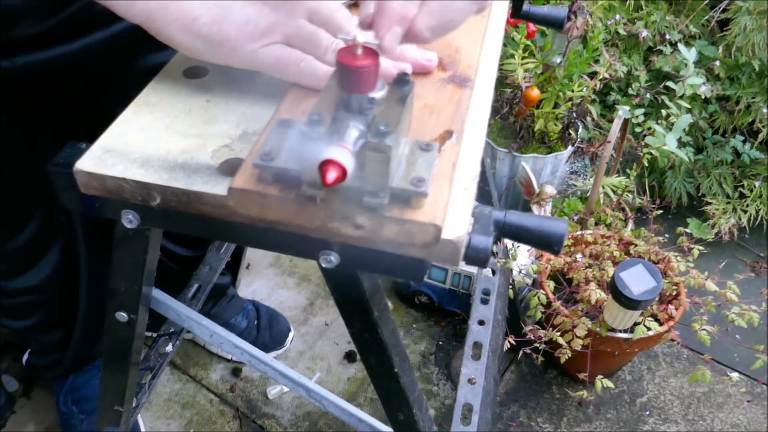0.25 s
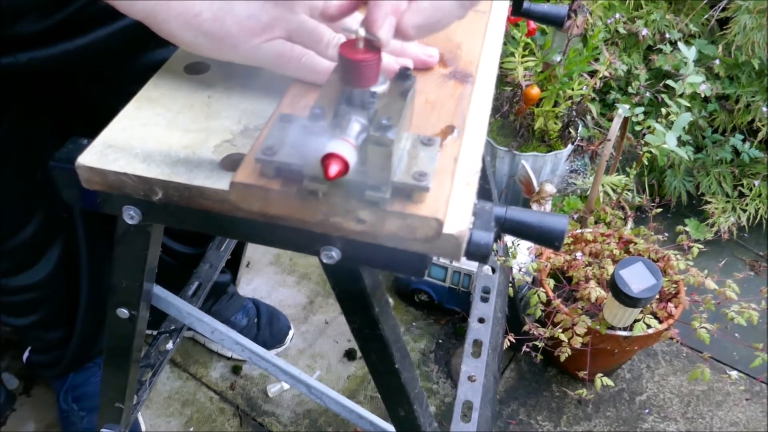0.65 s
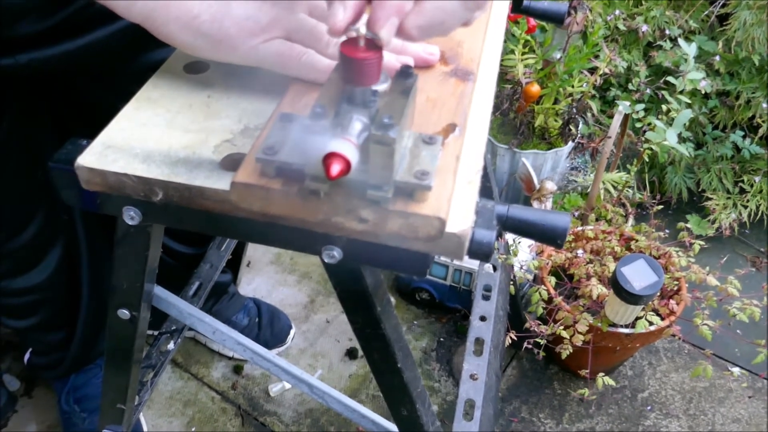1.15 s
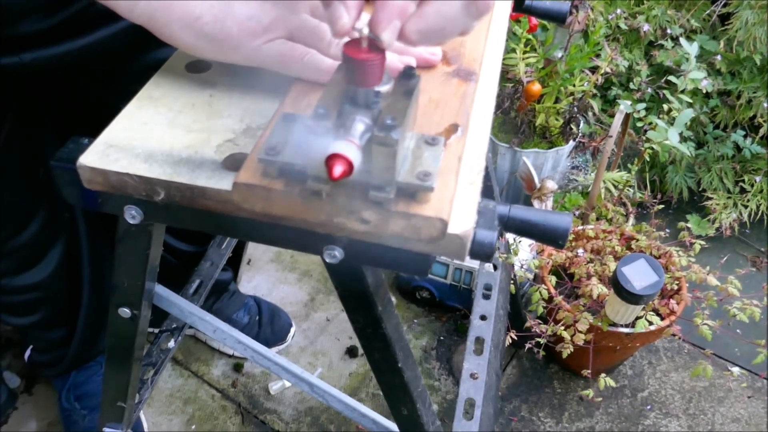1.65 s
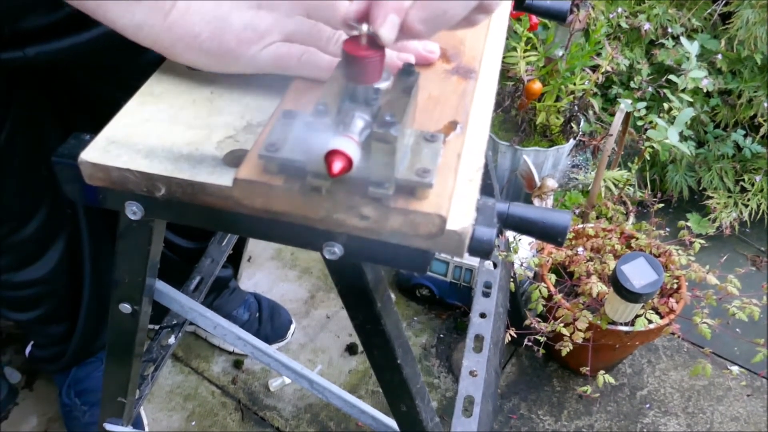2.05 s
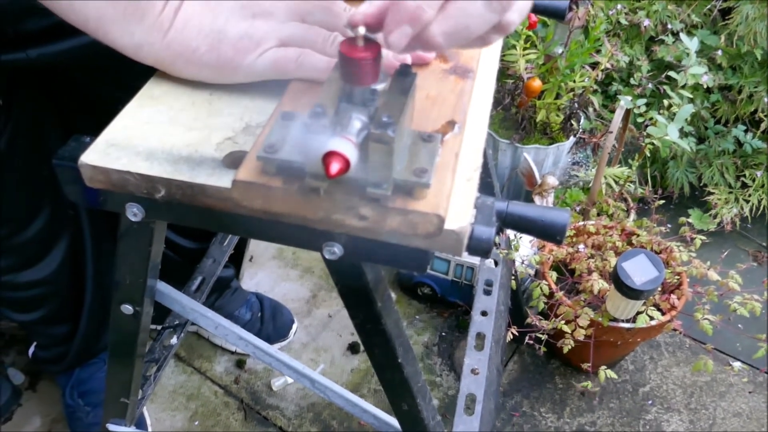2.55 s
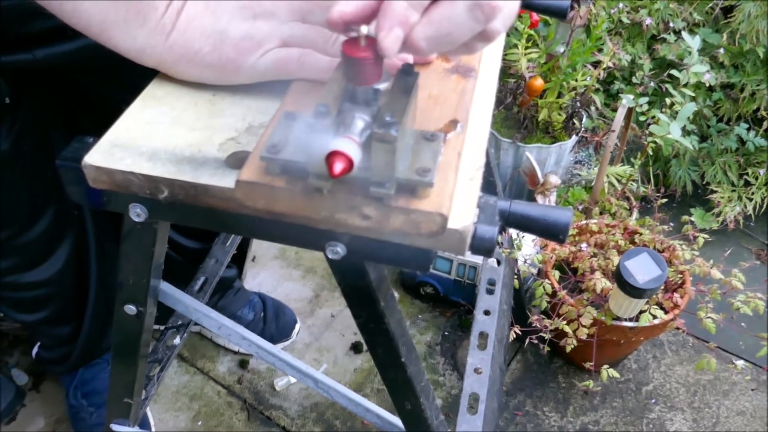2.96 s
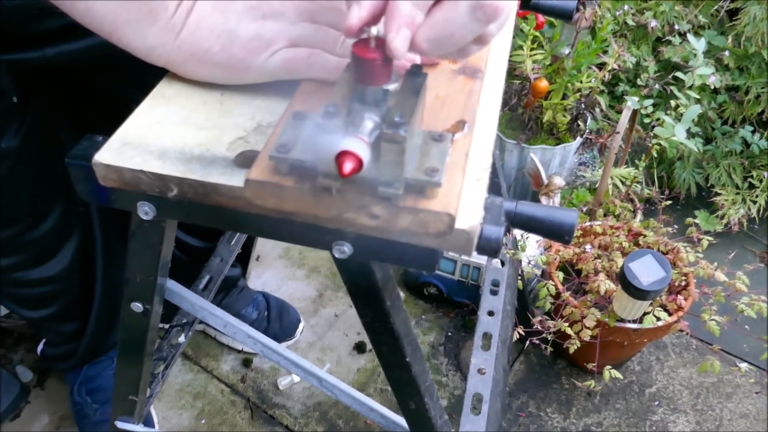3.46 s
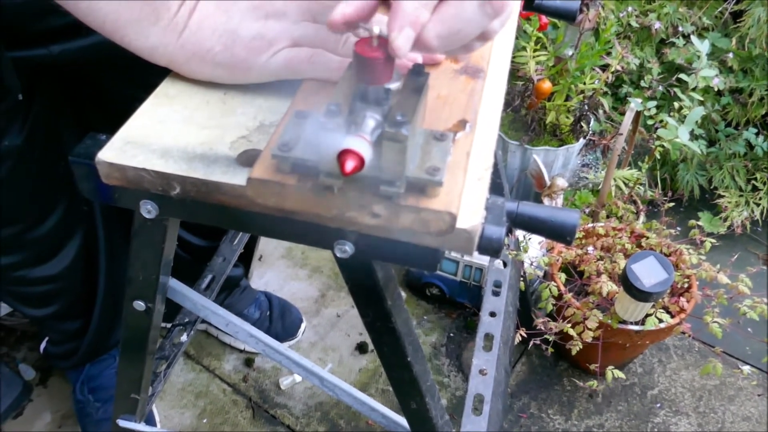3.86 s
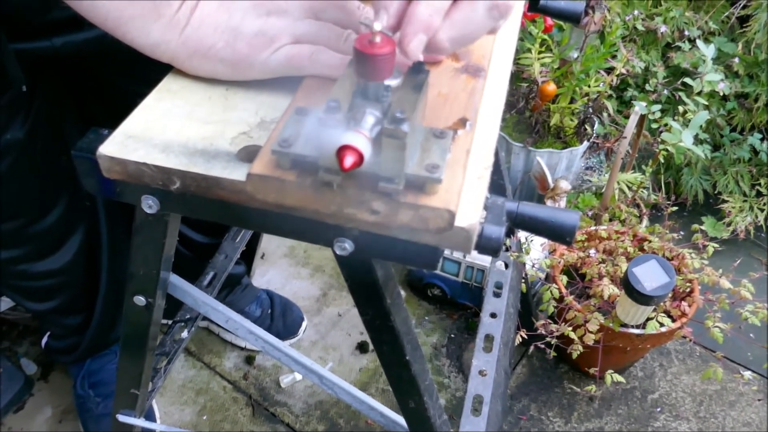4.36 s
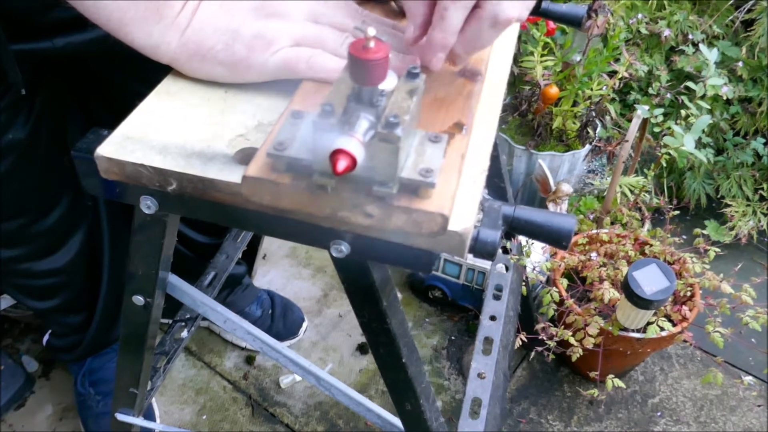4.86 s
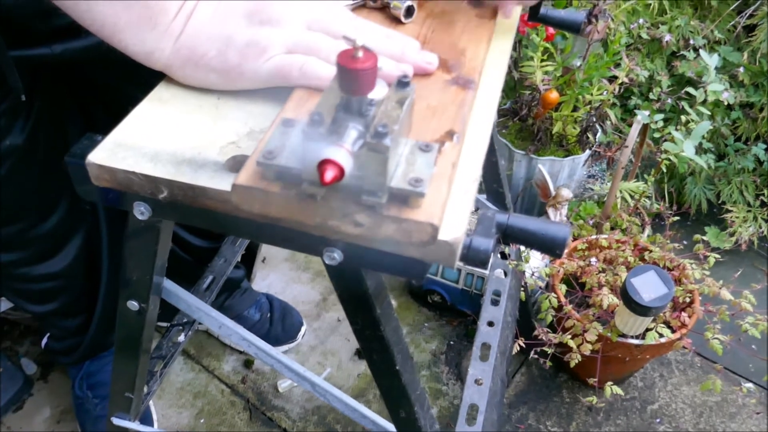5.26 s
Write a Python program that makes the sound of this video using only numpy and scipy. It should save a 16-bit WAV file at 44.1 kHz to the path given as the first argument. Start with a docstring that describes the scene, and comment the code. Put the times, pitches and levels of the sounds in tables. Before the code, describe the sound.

Close up and outdoors, a small model engine on a workbench gives a continuous, hard buzz over the hum and airflow of its propeller, with a thin metallic rattle on top. Its pitch wavers, dips a little and climbs back. A hand adjusting a screw by the exhaust makes the buzz slightly hollow, before it opens into a raspier tone about four seconds in.

```python
"""A model two-stroke diesel engine runs flat out on a wooden workbench in a garden, a hand close by.
From the start its propeller hums and blows air. Each turn brings a fine metallic knock, then a spit
of gas and a sharp exhaust pop that bounces off bench, paving and walls. The speed sags until 3 s.
Just after 2 s, and again from 3.3 s, fingers close round the exhaust to turn a screw and hollow the pop.
The speed recovers; at 4 s the sound opens up and turns raspier, then is partly shaded again by the end."""
import sys
import numpy as np
from scipy import signal
from scipy.fft import rfft, irfft, next_fast_len
from scipy.io import wavfile
from scipy.ndimage import uniform_filter1d

SR = 44100
rng = np.random.default_rng(int(sys.argv[2]) if len(sys.argv) > 2 else 0)


def store_pcm(level_fs):
    """Save levels as 16-bit WAV."""
    pcm = np.round(np.clip(level_fs, -1, 1) * 32767).astype(np.int16)
    wavfile.write(sys.argv[1], SR, np.atleast_2d(pcm).T)


N = 242550
TIME = np.arange(N) / SR
FFT_SIZE = next_fast_len(N + SR // 4)
HZ = np.maximum(np.arange(FFT_SIZE // 2 + 1) * SR / FFT_SIZE, 1)

# How fast the shaft spins: time_s, turns_per_s
SHAFT_SPEED = [(0.0, 115.6), (0.4, 114.9), (0.77, 115.2), (1.07, 113.9), (1.15, 114.2), (1.36, 113.4),
               (1.62, 114.0), (2.42, 109.2), (2.7, 109.7), (3.02, 108.4), (3.17, 108.7), (3.35, 110.6),
               (3.57, 110.9), (3.75, 110.1), (3.92, 110.5), (4.06, 112.1), (4.43, 112.2), (4.61, 112.8),
               (4.84, 111.7), (5.5, 113.6)]
# How much the hand shades the sound: time_s, shade_0_to_1
HAND_SHADE = [(0, 0.73), (1.1, 0.84), (2.1, 0.73), (3.94, 0.74), (4.04, 0.23), (4.35, 0.37), (4.5, 0.47),
              (4.95, 0.46), (5.4, 0.7)]
# Tone of the swirling air from propeller and exhaust: pitch_hz, relative_level_db
AIR_TONE = [(25, -24), (100, -16), (200, -11.5), (400, -7), (700, -4.5), (1400, -2.5), (2600, 1.5),
            (3200, -4), (4000, -8), (4800, -6), (5500, -5), (6200, -12.5), (9000, -12.5), (15500, -24)]
# Echoes off bench top, paving and walls: delay_ms, strength (minus flips the wave)
SURFACE_ECHOES = [(1.726, 0.14), (1.98, -0.25), (2.166, -0.24), (3.698, -0.22), (6.323, -0.08),
                  (8.355, 0.16), (11.058, -0.22), (12.979, -0.12), (13.139, -0.12), (17.615, -0.1)]
# Tone of the piston's knock: pitch_hz, relative_level_db
KNOCK_TONE = [(200, -47), (2000, 10.5), (5000, 4), (6400, -9), (7200, -3), (8600, -0.5), (10000, -5),
              (12000, -11), (15500, -1.5)]
# Pitches at which the engine's metal case rings: pitch_hz, width_hz, boost_db
CASE_RINGS = [(6600, 400, 3), (7950, 270, 9), (8730, 70, 12), (9350, 350, 6), (12100, 420, 8)]
# Tone of gas hissing through the exhaust port: pitch_hz, relative_level_db
HISS_TONE = [(200, -43), (2000, -16), (5000, 9.5), (7000, 3.5), (9500, -6), (12000, -0.5), (13400, -4),
             (15500, -2)]
# Tone of one exhaust pop: pitch_hz, relative_level_db
POP_TONE = [(110, -35.5), (330, -11), (450, -16), (620, -6.5), (1200, -2.5), (2000, -4.5), (2700, 4.5),
            (3050, -7), (3450, -1), (4050, -8.5), (4550, -5), (5400, -7.5), (6000, -23.5), (15000, -41)]
# Peaks and dips that the bench and its surroundings add to the pop: pitch_hz, width_hz, boost_db
BENCH_PEAKS = [(324, 12, -2.5), (466.5, 27, 12.5), (506, 21, -24), (720.5, 52, -16.5), (1103, 46, -5.5),
               (1244.6, 19, -8.5), (1356, 13, 11), (1397, 61, -8), (1438, 50, 6.5), (1553, 34, -2.5),
               (1605, 13, 9), (1768, 55, -6.5), (1897, 224, 8), (1980, 12, -6), (2530, 34, 7.5),
               (3150, 36, 10), (4477, 114, 5), (6510, 240, 8), (7420, 880, -22.5)]
# The pop's five bands, low to high (body, bark, ring, rasp, crack):
# level_db, speed_db (per extra turn a second), shade_db, grip_db
POP_BANDS = [(-33, -0.09, -1.88, 1), (-31, -0.1, -2, -3.5), (-36, 0.4, 2.5, 1.7), (-34.5, 0.4, -6.5, -0.6),
             (-37, -.1, -0.8, 1)]
# Where one of those bands ends and the next begins: pitch_hz
BAND_BORDERS = [1750, 2490, 3000, 4050]
# Fingers closing round the exhaust: start_s, end_s, tightness_0_to_1
FINGER_GRIPS = [(2.068, 2.36, 0.96), (3.277, 4.022, 0.93)]
# How alike the noise is on the left and right: pitch_hz, likeness_0_to_1
STEREO_LIKENESS = [(30, 0.63), (70, 0.36), (200, 0.84), (1000, 0.82), (4000, 1), (6500, 0.53), (8600, 0.63),
                   (11000, 0.92), (15000, 1)]
# How much louder the left is than the right: pitch_hz, difference_db
LEFT_LOUDER = [(60, -11), (110, -0.5), (220, 1.2), (340, -1), (480, -1.5), (740, 1.6), (1220, 3),
               (3300, -0.7), (5500, 1), (9000, -.5)]
# How far the left wave runs ahead of the right: pitch_hz, phase_radians
LEFT_AHEAD = [(0, 0), (1030, 0.13), (1460, -0.28), (1980, -0.12), (5600, -0.14), (6550, 0.071),
              (8010, -0.37), (8270, -0.1), (9130, -0.35), (9820, 0.036), (16000, 0.0), (16500, 0.1)]


def from_db(db):
    """Turn decibels into a number to multiply by."""
    return 10 ** (np.asarray(db) / 20)


def unit_level(x):
    """Scale a signal so that its average level (rms) is 1."""
    return x / np.sqrt(np.mean(x ** 2) + 1e-20)


def steady_level(x, window=6000):
    """Hold the level near 1 from moment to moment."""
    power = uniform_filter1d(uniform_filter1d(x ** 2, window), window // 2)
    return x / np.sqrt(power + 1e-20)


def over_time(table):
    """Join a table's points into a value for every sample."""
    time_s, value = np.transpose(table)
    return np.interp(TIME, time_s, value)


def over_pitch(table):
    """Join a table's points into a value for every frequency."""
    pitch_hz, value = np.transpose(table)
    return np.interp(np.log(HZ), np.log(pitch_hz), value)


def peaks_db(table):
    """Draw a bell-shaped peak or dip around each listed pitch."""
    return sum(db / (1 + (2 * (HZ - hz) / width_hz) ** 2) for hz, width_hz, db in table)


def filtered(x, response):
    """Scale and delay each frequency of a signal as the response says."""
    return irfft(rfft(x, FFT_SIZE) * response, FFT_SIZE)[..., :N]


def ringing_filter(tone_db):
    """A filter with this tone that rings only after a hit, never before (minimum phase)."""
    cepstrum = irfft(np.log(from_db(tone_db)), FFT_SIZE)
    cepstrum[1:FFT_SIZE // 2] *= 2
    cepstrum[FFT_SIZE // 2 + 1:] = 0
    return np.exp(rfft(cepstrum))


def sway(spread_db, rate_hz=2.56, step=40):
    """A slow, random rise and fall in level, in decibels."""
    memory = np.exp(-2 * np.pi * step * rate_hz / SR)
    noise = rng.standard_normal(2 * N // step)
    slow = signal.lfilter([1], [1, -2 * memory, memory ** 2], noise)[N // step:]
    slow = unit_level(slow - slow.mean())
    return spread_db * np.interp(np.arange(N) / step, np.arange(len(slow)), slow)


def stereo_noise():
    """White noise that is partly alike on the left and right."""
    alike = np.clip(over_pitch(STEREO_LIKENESS), 0, 1)
    mid, side = rng.standard_normal((2, N))
    shared = filtered(mid, np.sqrt((1 + alike) / 2))
    opposite = filtered(side, np.sqrt((1 - alike) / 2)) * [[1], [-1]]
    return shared + opposite


def click_each_turn(turns, jitter_s, spread_db, reach=8):
    """One click for each turn of the shaft, a little uneven in time and strength."""
    whole_turns = np.arange(np.ceil(turns[0]), turns[-1])
    chance = rng.standard_normal((len(whole_turns), 2))
    centres = (np.interp(whole_turns, turns, TIME) + jitter_s * chance[:, 0])[:, None] * SR
    samples = centres.astype(int) + np.arange(1 - reach, reach + 1)
    offset = samples - centres
    shape = np.sinc(offset) * np.sinc(offset / reach)   # lets a click fall between two samples
    clicks = shape * from_db(spread_db * chance[:, 1:])
    return np.bincount(np.clip(samples, 0, N - 1).ravel(), clicks.ravel(), N)


def puff_each_turn(turns, rise_turns):
    """A swell that rises once a turn and then dies away."""
    age = turns % 1 / rise_turns
    return age * np.exp(1 - age)


def echo_filter(dull_hz=3100, scatter_hz=5400):
    """Direct sound plus dull echoes, which strengthen some pitches and weaken others."""
    bounces = sum(strength * np.exp(-2j * np.pi * HZ * ms / 1000) for ms, strength in SURFACE_ECHOES)
    treble_loss = np.sqrt(1 + (HZ / scatter_hz) ** 4)   # rough surfaces scatter the treble away
    return 1 + bounces / (1 + 1j * HZ / dull_hz) / treble_loss


def propeller_hum(turns, level_db, blades=2):
    """Each passing blade pushes the air, making a clean hum."""
    return from_db(level_db) * np.sqrt(2) * np.sin(2 * np.pi * blades * turns)


def rushing_air(turns, level_db, surge=0.22, rumble_cut_hz=25):
    """Swirling air swells a little after every pop and echoes off the surroundings."""
    air = stereo_noise() * (1 + surge * puff_each_turn(turns, rise_turns=0.55))
    rumble_cut = 1 / (1 + (rumble_cut_hz / HZ) ** 2)
    tone = ringing_filter(over_pitch(AIR_TONE)) * echo_filter() * rumble_cut
    return from_db(level_db) * unit_level(filtered(air, tone))


def piston_knock(turns, level_db, after_pop_turns=0.76):
    """Firing takes up the slack in piston and rod: a tick and a brief rattle ring the metal case."""
    knock_turns = turns - after_pop_turns
    tick = unit_level(click_each_turn(knock_turns, jitter_s=6e-6, spread_db=1.5))
    rattle = unit_level(stereo_noise() * puff_each_turn(knock_turns + 0.02, rise_turns=0.06))
    case = ringing_filter(over_pitch(KNOCK_TONE) + peaks_db(CASE_RINGS))
    return from_db(level_db) * unit_level(filtered(rattle + 0.5 * tick, case * echo_filter()))


def hand_echo(x, shade, delay_s=0.00012):
    """Sound bouncing off the nearby hand mixes with the direct sound and hollows it."""
    bounce = filtered(x, np.exp(-2j * np.pi * HZ * delay_s))
    strength = 0.28 * shade
    return (x - strength * bounce) / np.sqrt(1 + strength ** 2)


def port_hiss(turns, level_db):
    """A very short spit of gas escapes as the exhaust port starts to open."""
    spit = stereo_noise() * puff_each_turn(turns, rise_turns=0.035)
    tone = ringing_filter(over_pitch(HISS_TONE))
    return from_db(level_db) * unit_level(filtered(spit, tone))


def exhaust_pops(turns, band_levels_db):
    """The open port lets out one pop a turn; each of its five bands follows its own level."""
    clicks = click_each_turn(turns, jitter_s=1.5e-6, spread_db=0.28)
    tone = ringing_filter(over_pitch(POP_TONE) + peaks_db(BENCH_PEAKS))
    phase_turn = np.exp(1j * np.pi / 3)   # shapes each pop: a small push, then a sharp main dip
    pops = filtered(clicks, tone * phase_turn * echo_filter())
    below_border = [1 / (1 + (HZ / hz) ** 40) for hz in BAND_BORDERS]
    bands = np.diff(below_border, axis=0, prepend=0, append=1)
    return sum(from_db(db) * steady_level(filtered(pops, band))
               for db, band in zip(band_levels_db, bands))


def pop_levels_db(extra_speed, shade, grip):
    """Speed brightens the pop; the hand and its grip soften the bark and rasp and lift the ring."""
    return [level_db + speed_db * extra_speed + shade_db * shade + grip_db * grip + sway(spread_db=0.73)
            for level_db, speed_db, shade_db, grip_db in POP_BANDS]


def finger_grip(move_s=0.039):
    """How tightly the fingers wrap the exhaust: each grip closes, holds and opens."""
    return sum(tightness * np.clip(np.minimum(TIME - start_s, end_s - TIME) / move_s, 0, 1)
               for start_s, end_s, tightness in FINGER_GRIPS)


def scene():
    """The turning shaft times every sound; its speed and the hand change the levels."""
    speed = over_time(SHAFT_SPEED)
    shade = over_time(HAND_SHADE)
    extra_speed = speed - 112   # turns a second above the usual speed
    turns = np.cumsum(speed) / SR - 0.2   # the first pop comes a fifth of a turn in
    hum = propeller_hum(turns, level_db=-38.5 - 3.5 * shade + sway(spread_db=0.44))
    air = rushing_air(turns, level_db=-41.5)
    knock = piston_knock(turns, level_db=-44.5 - shade + sway(spread_db=1.67))
    hiss = port_hiss(turns, level_db=-59 + extra_speed + 9 * shade)   # louder as the jet meets the hand
    pops = exhaust_pops(turns, pop_levels_db(extra_speed, shade, finger_grip()))
    return hum + hand_echo(air + knock + hiss, shade) + pops


def record(dry):
    """Set left and right a little apart in level and timing, and cut the highest treble."""
    left = from_db(over_pitch(LEFT_LOUDER) / 2) * np.exp(0.5j * over_pitch(LEFT_AHEAD))
    right = 1 / left
    cutoff_hz = 15780
    treble_cut = 1 / np.sqrt(1 + (HZ / cutoff_hz) ** 300)
    return filtered(dry, np.array([left, right]) * treble_cut)


dry = scene()
out = record(dry)
store_pcm(out)
```